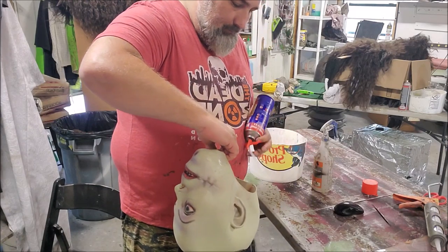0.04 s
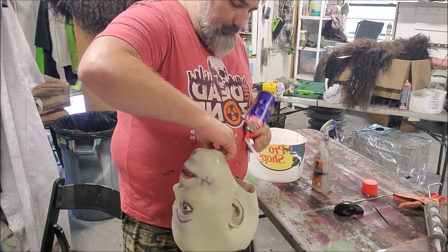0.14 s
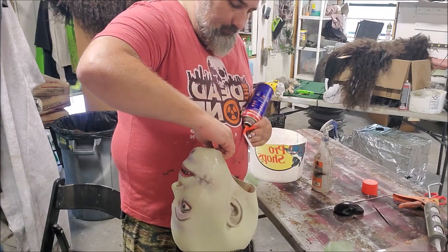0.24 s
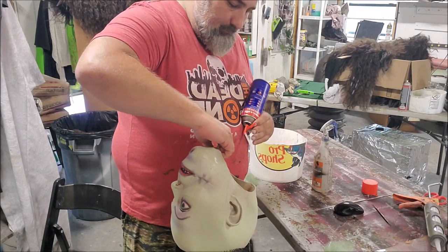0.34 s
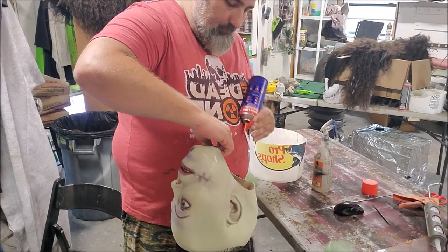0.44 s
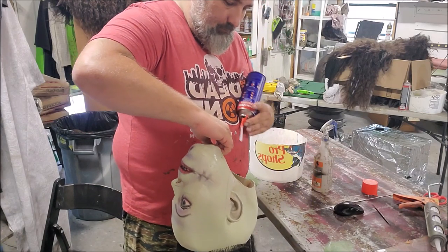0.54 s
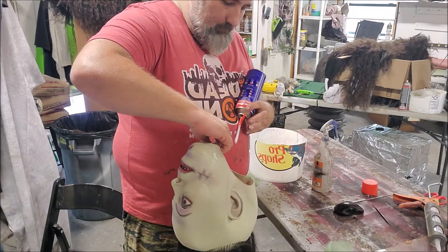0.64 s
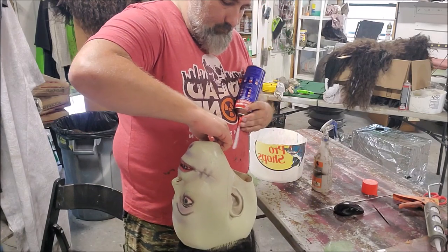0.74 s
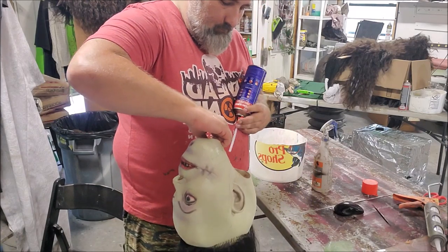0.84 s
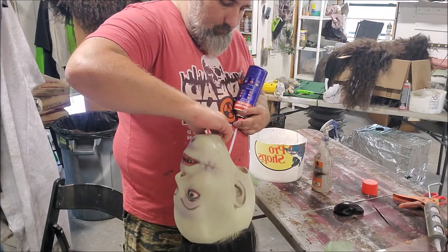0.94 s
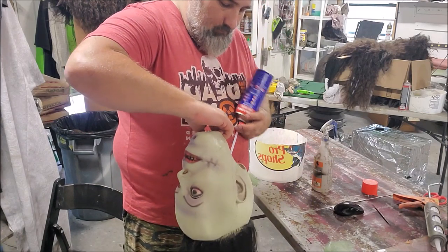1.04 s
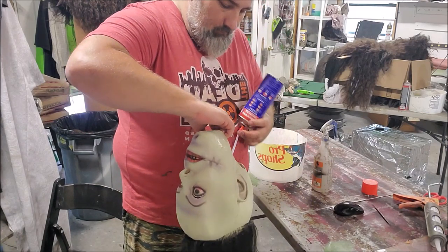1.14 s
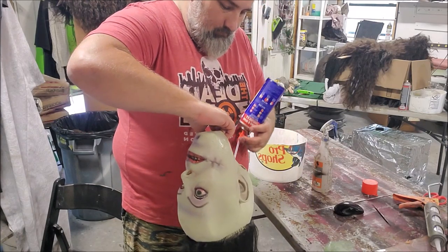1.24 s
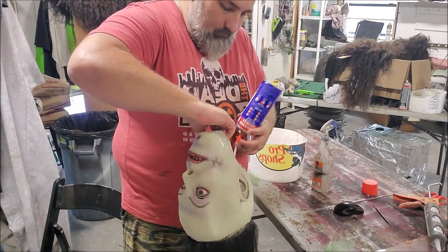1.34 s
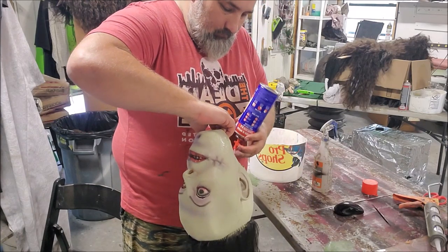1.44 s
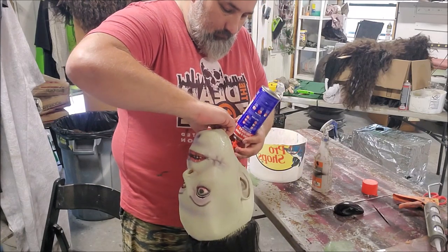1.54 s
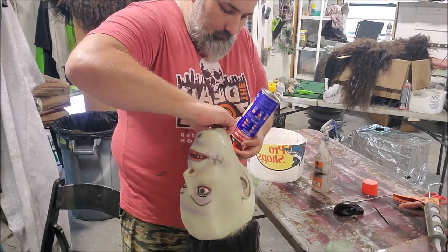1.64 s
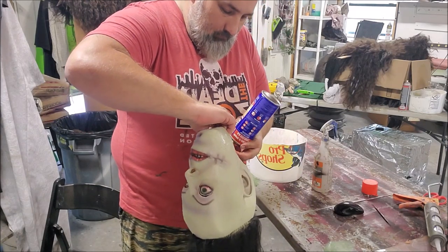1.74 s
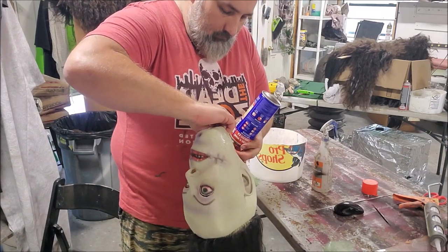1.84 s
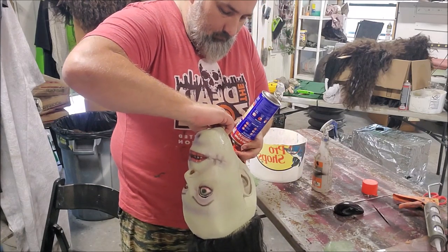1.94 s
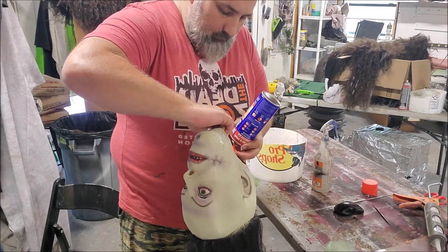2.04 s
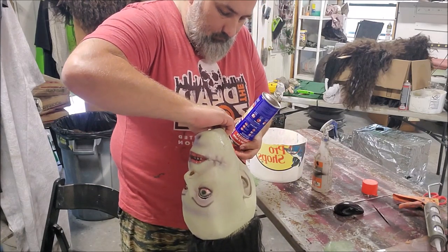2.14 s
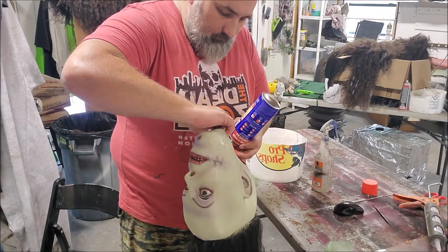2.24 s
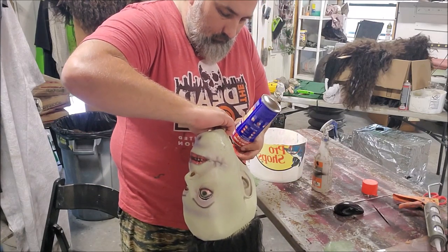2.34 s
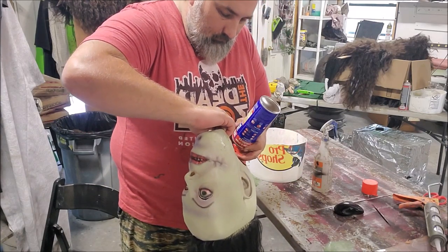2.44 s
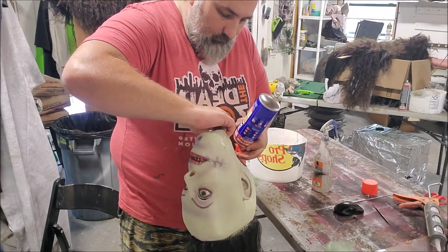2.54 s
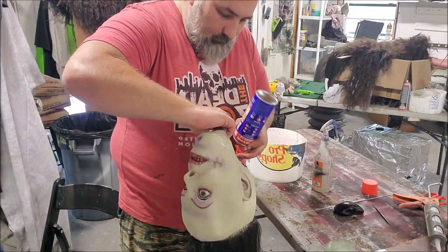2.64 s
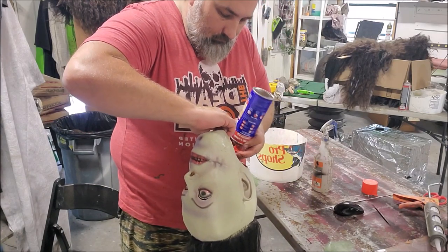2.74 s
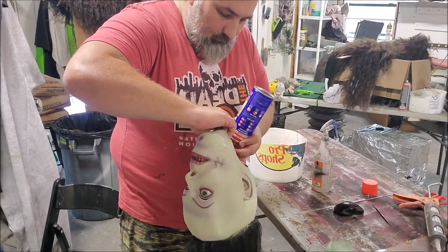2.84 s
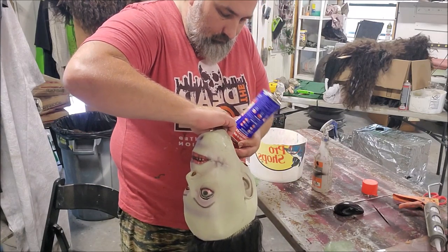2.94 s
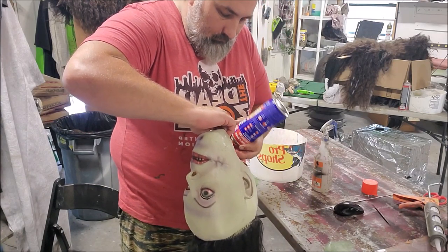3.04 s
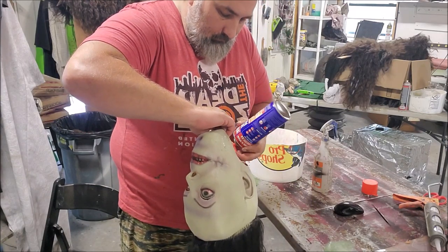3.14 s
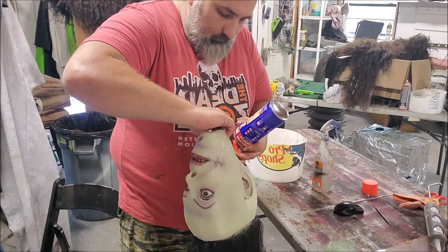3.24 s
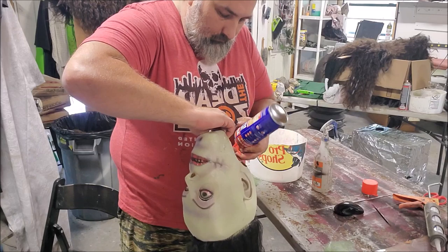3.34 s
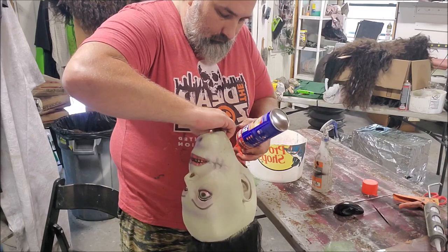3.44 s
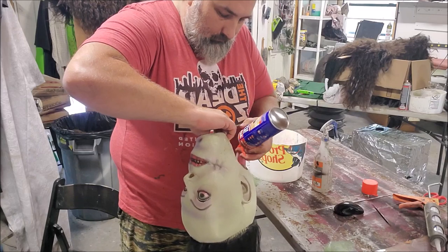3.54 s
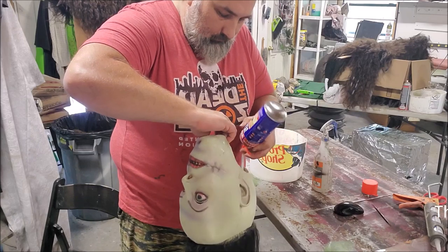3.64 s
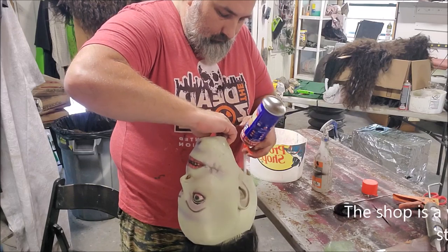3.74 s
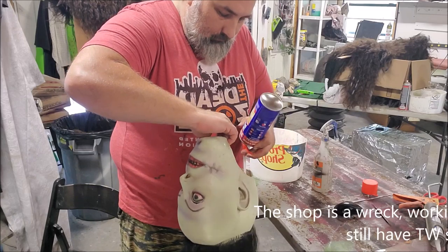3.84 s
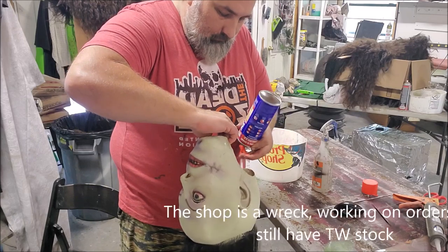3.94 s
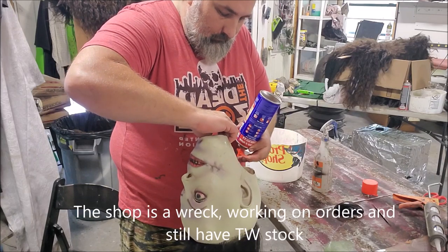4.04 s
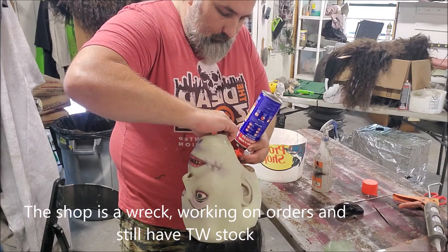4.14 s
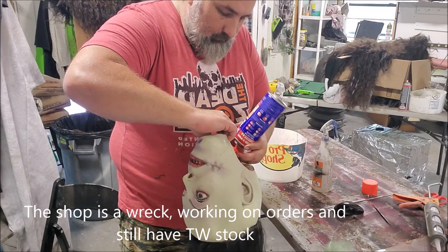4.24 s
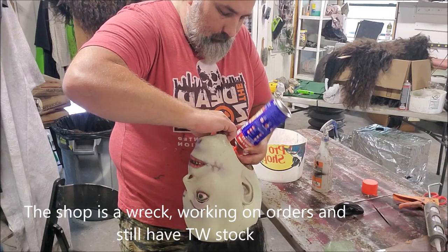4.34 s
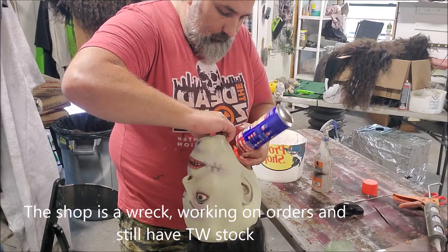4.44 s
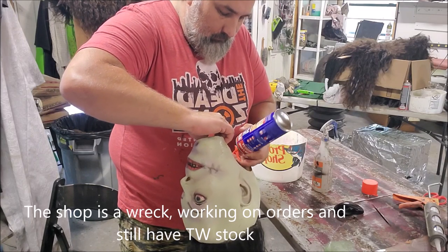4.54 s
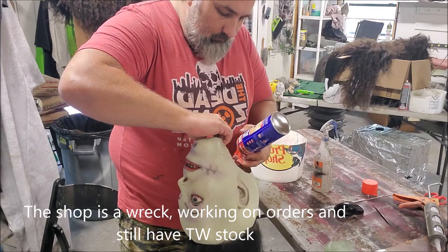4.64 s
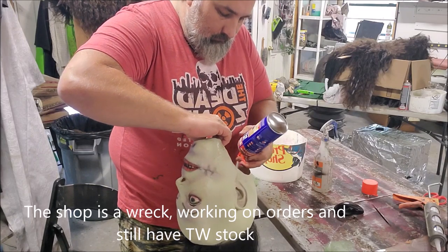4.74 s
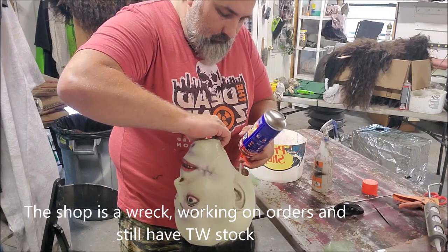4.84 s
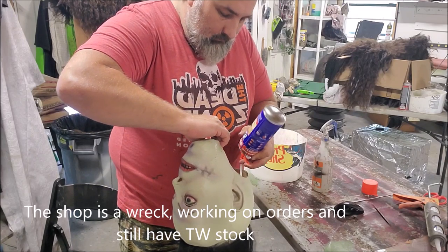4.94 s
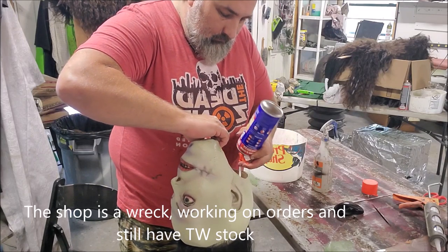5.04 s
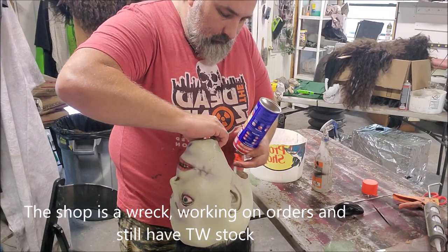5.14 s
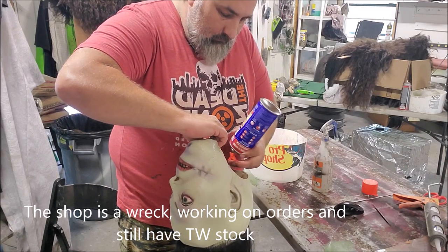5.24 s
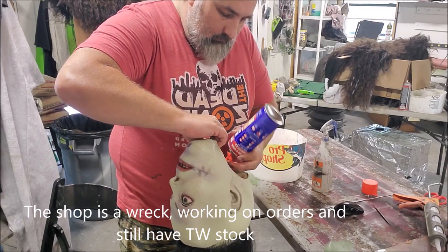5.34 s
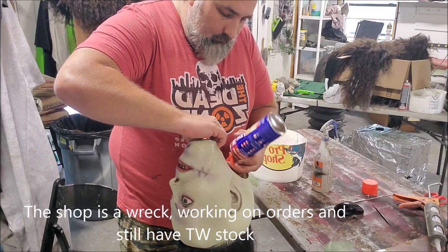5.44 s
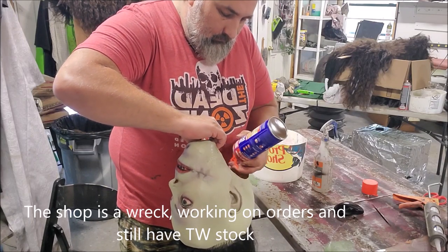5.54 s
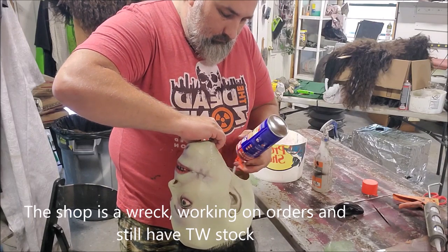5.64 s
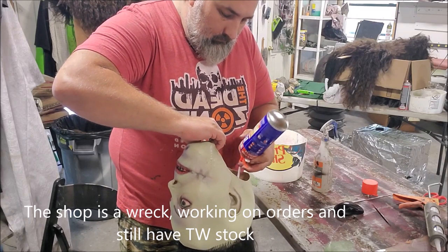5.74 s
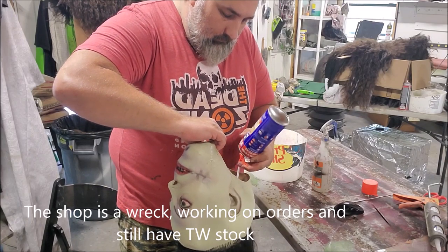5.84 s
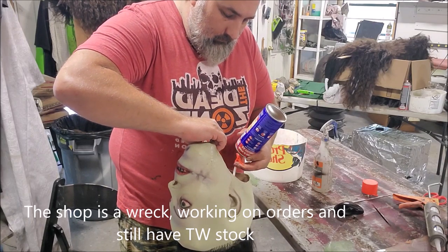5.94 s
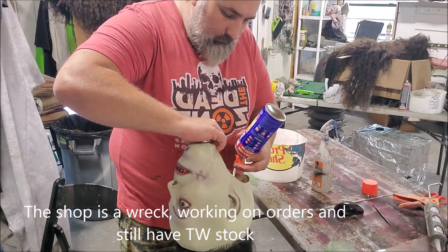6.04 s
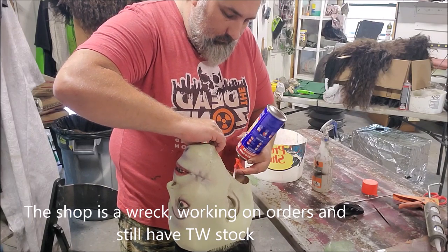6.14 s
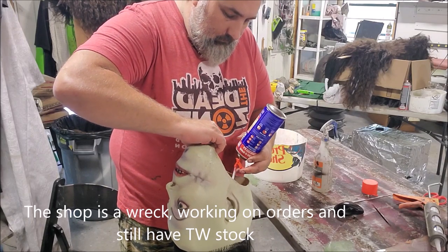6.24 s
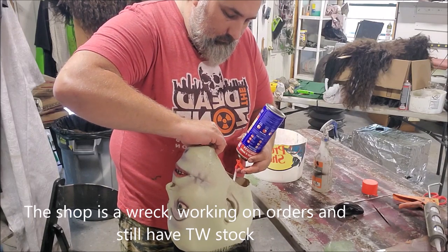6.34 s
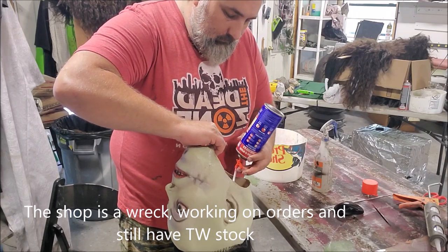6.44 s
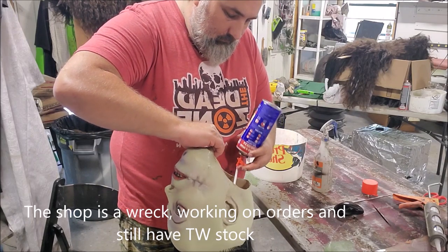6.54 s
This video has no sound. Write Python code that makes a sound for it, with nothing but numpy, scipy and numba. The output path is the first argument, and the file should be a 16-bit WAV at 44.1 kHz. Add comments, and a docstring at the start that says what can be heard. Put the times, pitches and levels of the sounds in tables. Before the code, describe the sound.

An aerosol can sprays foam into a hollow rubber mask in a workshop. A small nozzle tick and a faint leak come first, then a short wet sputter and a steady, bright, grainy hiss. Its tone wavers as the straw moves and foam churns inside the mask, until it stops abruptly. It is heard in stereo, slightly to the left and a short distance away, with quiet ventilation humming throughout.

```python
"""Foam sprayed into a rubber mask

A workshop with a low ventilation hum. The can is a little left of a stereo pair, far enough off that
the room's brief ring is about as loud as the direct sound. After faint swells of hiss, a finger ticks on
the nozzle and the valve leaks, then opens with a wet spit. The jet hisses through a straw for four
seconds and stops at once. As the straw moves about, the gaps and the hollow of the mask colour it."""
import sys
import numpy as np
from scipy import signal
from scipy.fft import rfft, irfft, next_fast_len
from scipy.io import wavfile
from numba import njit

SR = 44100
rng = np.random.default_rng(int(sys.argv[2]) if len(sys.argv) > 2 else 0)


def inscribe(sig):
    """Save sig as 16-bit PCM at rate SR to the path in sys.argv[1].

    A 1-D sig is mono; a 2-D sig holds one channel per row.
    Samples are clipped to [-1, 1] before scaling.
    """
    pcm = np.round(np.clip(np.atleast_2d(sig).T, -1, 1) * 32767)
    wavfile.write(sys.argv[1], SR, pcm.astype(np.int16))


N = 291060

# Event levels are at the source, ahead of the room; spectra and modes give only a shape.
# room tone of moving air: frequency_hz, level_db
AIR_SPECTRUM = [(25, -3), (50, -7), (110, 1), (160, -8), (270, -3.5), (450, -13), (600, -14), (880, -14.5),
                (1150, -20), (2200, -24), (3000, -36.5), (4500, -38.5), (9000, -40), (15800, -38)]
# how alike that air is at the two microphones: frequency_hz, correlation
AIR_CORRELATION = [(30, .75), (80, 1), (300, .8), (1000, 0), (4000, 0), (12000, .1)]
# faint, brief swells of hiss before the spray: start_s, length_s, level_db
FAINT_SWELLS = [(-0.02, 0.078, -68), (0.14, 0.15, -74), (0.48, 0.36, -76), (1.165, 0.23, -76),
                (1.772, 0.1, -66)]
# their soft, high hiss: frequency_hz, level_db
FAINT_HISS_SPECTRUM = [(1000, -16), (2200, 5.5), (4000, -5), (6000, -1), (8500, -13), (12000, -5),
                       (15000, -1)]
# finger on the nozzle: start_s, level_db
NOZZLE_TICKS = [(1.166, -66), (1.309, -49.5)]
# plastic click: frequency_hz, level_db
TICK_SPECTRUM = [(800, -22), (2000, 2), (3200, 4), (5000, -2), (9000, -4), (15000, -9)]
# first wet foam: frequency_hz, level_db
SPIT_SPECTRUM = [(100, -24.5), (200, -12), (310, -7.5), (400, 4), (490, -9), (680, -16.5), (880, -10.5),
                 (1050, -21.5), (1330, -5), (1550, -22), (1800, -2), (2080, -22.5), (6000, -32.5),
                 (15000, -20.5)]
# spurts of gas before the jet is steady: start_s, length_s, flow_db (0 is fully open)
VALVE_SPURTS = [(1.866, 0.022, -13), (1.923, 0.028, -10.5)]
# gas rushing from the straw: frequency_hz, level_db
RUSH_SPECTRUM = [(80, -43), (220, -24.5), (600, -17.5), (1000, -21), (1500, -13.5), (2000, -8), (2400, -1),
                 (3200, -1.5), (4100, -3), (4700, -8.5), (6000, -19), (7500, -35.5), (10000, -36)]
# tiny bubbles bursting: frequency_hz, level_db
FIZZ_SPECTRUM = [(2500, -20), (4200, 1), (5000, 2), (6500, -1), (7200, -6), (8000, -12.5), (10000, -14.5),
                 (12000, -11.5), (14500, -13), (15800, -18.5)]
# modes of the bare rubber wall under the jet: pitch_hz, width_hz, level_db
WALL_MODES = [(1360, 19, -16), (1804, 37, -2), (2136, 99, -6.5), (2690, 57, -7.5), (3284, 100, 3.5),
              (3870, 174, -7.5), (4890, 440, -11.5)]
# foam churning in the mask: frequency_hz, level_db
CHURN_SPECTRUM = [(50, -19.5), (110, -6), (170, 4), (300, 2.5), (480, -2), (610, -6), (900, -5), (1400, 2),
                  (2200, -3), (4000, -12)]
# modes of the mask's shell: pitch_hz, width_hz, level_db
SHELL_MODES = [(264, 29.3, -4.5), (360.3, 22, -2.5), (379.8, 34, 2.5), (427.5, 31, -5), (510, 50, -8.5),
               (887, 29, -5), (1297, 32, -2), (1380, 44, -7)]
# air pockets around the straw's tip: start_s, length_s, level_db, first_hz, last_hz
AIR_POCKETS = [(1.99, 0.27, -32, 4130, 3200), (2.36, 0.19, -30.5, 2720, 2780),
               (2.6, 0.15, -33.5, 3700, 3630), (3.08, 0.12, -33.5, 2580, 2300),
               (3.48, 0.26, -29.5, 3300, 2420), (3.98, 0.12, -30.5, 3007, 3230),
               (4.18, 0.091, -30.5, 2400, 2280), (4.47, 0.15, -30.5, 3825, 3700),
               (4.66, 0.17, -29.5, 3222, 3170), (5.19, 0.37, -33.5, 3270, 3880),
               (5.5, 0.23, -30.5, 2500, 3050), (5.83, 0.35, -32.5, 3370, 3100)]
# narrow gaps between straw and rubber: start_s, length_s, level_db, first_hz, last_hz
STRAW_GAPS = [(2.42, 0.24, -36, 2220, 2300), (3.42, 0.56, -33.5, 2020, 1570),
              (4.14, 0.16, -33.5, 1780, 1780), (4.49, 0.22, -32.5, 1690, 2400),
              (4.75, 0.25, -34.5, 1710, 1700), (5.48, 0.13, -33.5, 1960, 2108),
              (5.72, 0.1, -34, 1690, 1650)]
# the jet catches the mask's hollow: start_s, length_s, level_db
HOLLOW_SWELLS = [(2.42, 0.33, -42), (2.88, 0.3, -38.5), (3.36, 0.63, -37), (4.205, 0.26, -39.5),
                 (4.693, 0.33, -39.5), (5.067, 0.083, -46), (5.27, 0.16, -48.5), (5.65, 0.21, -44.5)]
# the tip dips into the foam and chokes the rush: start_s, length_s, change_db
TIP_CHOKES = [(4.278, 0.14, -3), (4.92, 0.085, -4.5)]
# room sound against direct sound: frequency_hz, level_db
ROOM_SPECTRUM = [(150, -7), (400, -10.5), (1000, 1.5), (3000, 0.5), (8000, 2.5), (15000, 5.5)]
# room decay: frequency_hz, t60_s
ROOM_DECAY = [(200, 0.94), (800, 0.3), (3000, 0.42), (12000, 0.25)]
# left microphone minus right: frequency_hz, difference_db
LEFT_LEAN = [(200, 0.8), (700, 0.1), (1300, 1.9), (2400, 1.4), (4400, 3.5), (8100, 1), (10500, 0),
             (14000, 7)]

# the valve starts to leak, cracks open, is pressed fully and is let go
LEAK_S, CRACK_S, OPEN_S, SHUT_S = 1.22, 1.866, 1.985, 6.212
SHUT_DB_PER_S = 745
TIME_S = np.arange(N) / SR


def from_db(db):
    """Decibels to gain."""
    return 10 ** (np.asarray(db) / 20)


def rms_one(x):
    """Scale to rms 1."""
    return x / np.sqrt(np.mean(x ** 2) + 1e-20)


def at_hz(points, hz):
    """Read a table on a log-frequency axis."""
    points_hz, values = np.transpose(points)
    return np.interp(np.log(np.maximum(hz, 1)), np.log(points_hz), values)


def colour(x, spectrum, power=1):
    """Filter a sound by a spectrum whose decibels are multiplied by power."""
    size = next_fast_len(x.shape[-1])
    gain = from_db(power * at_hz(spectrum, np.fft.rfftfreq(size, 1 / SR)))
    return irfft(rfft(x, size) * gain, size)[..., :x.shape[-1]]


def drift(rate_hz):
    """Smooth random wander; rms 1."""
    hz = np.fft.rfftfreq(N, 1 / SR)
    return rms_one(irfft(rfft(rng.standard_normal(N)) / (1 + (hz / rate_hz) ** 2), N))


def since(start_s):
    """Seconds gone by since a moment; zero before it."""
    return np.maximum(TIME_S - start_s, 0)


def held(start_s, stop_s, attack_s, fall_db_per_s):
    """Attack, hold, and a steady fall in dB."""
    attack = np.minimum(since(start_s) / attack_s, 1)
    return attack * from_db(-np.minimum(fall_db_per_s * since(stop_s), 200))


def swell(start_s, length_s, fade_s):
    """Fade in, hold, fade out; half height at both ends."""
    inside_s = np.minimum(TIME_S - start_s, start_s + length_s - TIME_S)
    return np.clip(.5 + inside_s / fade_s, 0, 1)


def sweeps(rows, rest_db, rest_hz, fade_s):
    """Gain and pitch of a resonance that swells and glides once a row, then returns to rest."""
    power = from_db(rest_db) ** 2
    weighted_hz = power * rest_hz
    for start, length, db, first_hz, last_hz in rows:
        weight = (from_db(db) * swell(start, length, fade_s)) ** 2
        power += weight
        weighted_hz += weight * np.interp(TIME_S, [start, start + length], [first_hz, last_hz])
    return np.sqrt(power), weighted_hz / power


def resonate(x, hz, width_hz):
    """One resonance with gain 1 at its peak."""
    radius = np.exp(-np.pi * width_hz / SR)
    feedback = [1, -2 * radius * np.cos(2 * np.pi * hz / SR), radius ** 2]
    return signal.lfilter(np.array([1, 0, -1]) * (1 - radius ** 2) / 2, feedback, x)


def body(x, modes):
    """Parallel modes, each filtered twice at double its width for dark valleys; rms 1."""
    return rms_one(sum(from_db(db) * resonate(resonate(x, hz, 2 * width), hz, 2 * width)
                       for hz, width, db in modes))


@njit
def glide(x, angle, radius):
    """A resonance whose centre moves."""
    y = np.zeros(len(x))
    for i in range(2, len(x)):
        drive = (1 - radius ** 2) / 2 * (x[i] - x[i - 2])
        y[i] = drive + 2 * radius * np.cos(angle[i]) * y[i - 1] - radius ** 2 * y[i - 2]
    return y


def moving_band(x, hz, width_hz):
    """The moving resonance twice over, for steep flanks; rms 1."""
    angle, radius = 2 * np.pi * hz / SR, np.exp(-np.pi * width_hz / SR)
    return rms_one(glide(glide(x, angle, radius), angle, radius))


def grains(per_s, spread_db, hiss_db):
    """Random pops of uneven size, like bursting bubbles, in a smooth hiss; rms 1."""
    sizes = from_db(spread_db * np.minimum(rng.exponential(1, N), 5)) * rng.choice([-1, 1], N)
    pops = rms_one(sizes * (rng.random(N) < per_s / SR))
    return rms_one(pops + from_db(hiss_db) * rng.standard_normal(N))


def ventilation(hum_hz=74.0, rumble_hz=66.6, rise_s=5.66):
    """A wavering hum and rumble, both louder near the end, under the even noise of moving air."""
    risen = np.minimum(since(rise_s) / 0.088, 1)
    hum = from_db(-60 + 7 * risen) * body(rng.standard_normal(N), [(hum_hz, 12, 0)])
    rumble = from_db(-73.5 + 2 * risen) * body(rng.standard_normal((2, N)), [(rumble_hz, 58, 0)])
    correlation = np.clip(AIR_CORRELATION, 0, [SR, .99])
    side_spectrum = [(hz, 10 * np.log10((1 - alike) / (1 + alike))) for hz, alike in correlation]
    mid, side = rms_one(colour(rng.standard_normal((2, N)), AIR_SPECTRUM))
    air = mid + colour(side, side_spectrum) * [[1], [-1]]
    return hum + rumble + from_db(-61.5) * air


def faint_hiss():
    """Faint, brief swells of soft, high, grainy hiss come before the spray."""
    envelope = sum(from_db(db) * held(start, start + length, attack_s=0.015, fall_db_per_s=103)
                   for start, length, db in FAINT_SWELLS)
    hiss = grains(per_s=2500, spread_db=4.5, hiss_db=-1.5)
    return envelope * rms_one(colour(hiss, FAINT_HISS_SPECTRUM))


def ticks(t60_s=0.022):
    """A finger makes quickly damped clicks on the plastic nozzle."""
    envelope = sum((TIME_S >= start) * from_db(db - 60 * np.minimum(since(start) / t60_s, 3))
                   for start, db in NOZZLE_TICKS)
    return envelope * rms_one(colour(rng.standard_normal(N), TICK_SPECTRUM))


def leak(pitch_hz=3170, width_hz=330, press_s=1.79):
    """A little gas sings through the barely pressed valve, louder once the finger presses harder."""
    envelope = sum(from_db(db) * held(start, CRACK_S, attack_s=0.058, fall_db_per_s=SHUT_DB_PER_S)
                   for start, db in [(LEAK_S, -83), (press_s, -66)])
    return envelope * body(rng.standard_normal(N), [(pitch_hz, width_hz, 0)])


def spit(length_s=0.095):
    """Coarse wet bubbles are pushed out ahead of the jet."""
    ooze = from_db(-21) * swell(CRACK_S - 0.025, 0.04, fade_s=0.02)
    burst = held(CRACK_S, CRACK_S + length_s, attack_s=0.012, fall_db_per_s=131.5)
    bubbles = grains(per_s=1100, spread_db=4, hiss_db=6)
    return from_db(-29.5) * (ooze + burst) * rms_one(colour(bubbles, SPIT_SPECTRUM))


def valve(attack_s=0.007, fall_db_per_s=400):
    """Flow through the valve: it cracks open, spurts, opens fully and snaps shut."""
    cracked = from_db(-18.5) * held(CRACK_S, OPEN_S, attack_s, fall_db_per_s)
    spurts = [from_db(db) * held(start, start + length, attack_s, fall_db_per_s)
              for start, length, db in VALVE_SPURTS]
    fully_open = held(OPEN_S, SHUT_S, attack_s=0.022, fall_db_per_s=SHUT_DB_PER_S)
    return np.max([cracked, *spurts, fully_open], axis=0)


def stream():
    """The grainy flow of gas and foam that drives each resonance of the mask."""
    return grains(per_s=4000, spread_db=2.5, hiss_db=0)


def jet(choke, surge_s=0.1, rush_sag_db_per_s=0.9, fizz_sag_db_per_s=1.97):
    """Gas rushes and bubbles fizz out of the straw; both surge, then sag as the can loses pressure."""
    age_s = since(OPEN_S)
    surge = np.exp(-age_s / surge_s)
    rush_db = -27.5 - rush_sag_db_per_s * age_s + 7 * surge + 0.92 * drift(rate_hz=12)
    fizz_db = -33.5 - fizz_sag_db_per_s * age_s + 6 * surge + drift(rate_hz=3.9)
    rush = from_db(rush_db) * rms_one(colour(stream(), RUSH_SPECTRUM))
    bubbles = grains(per_s=1100, spread_db=7, hiss_db=9.5)
    fizz = from_db(fizz_db) * rms_one(colour(bubbles, FIZZ_SPECTRUM))
    return choke * rush + choke ** 0.71 * fizz


def bare_wall(coated_s=2.33, fade_db_per_s=52):
    """The rubber wall rings under the jet until foam coats it."""
    return from_db(-26 - fade_db_per_s * since(coated_s)) * body(stream(), WALL_MODES)


def churning_foam(gap_gain, growth_db_per_s=2.56):
    """Foam churns louder as it gathers and as open gaps stir it; returns sound and gain."""
    gathered = from_db(-53 + growth_db_per_s * since(OPEN_S))
    gain = np.hypot(gathered, from_db(-15) * gap_gain)
    return gain * rms_one(colour(stream(), CHURN_SPECTRUM)), gain


def mask_shell(churn_gain):
    """The shell rings harder the more foam churns inside it."""
    return from_db(-28) * churn_gain ** 0.28 * body(stream(), SHELL_MODES)


def air_pockets():
    """Pockets of air form around the straw's tip and ring brightly."""
    gain, pitch_hz = sweeps(AIR_POCKETS, rest_db=-41, rest_hz=3250, fade_s=0.034)
    return gain * moving_band(stream(), pitch_hz, width_hz=730)


def straw_gaps():
    """Narrow gaps open between straw and rubber and ring in the flow; returns sound and gain."""
    gain, pitch_hz = sweeps(STRAW_GAPS, rest_db=-45.5, rest_hz=1710, fade_s=0.095)
    return gain * moving_band(stream(), pitch_hz, width_hz=456), gain


def mask_hollow(first_hz=808.5, sag_hz_per_s=32.5, second_db_per_s=1.5):
    """The jet sounds two modes of the hollow; as it fills, both sink and the second gains."""
    age_s = since(OPEN_S)
    swells = sum(from_db(db) * swell(start, length, fade_s=0.063) for start, length, db in HOLLOW_SWELLS)
    pitch_hz = first_hz - sag_hz_per_s * age_s
    first_mode = from_db(-4.5) * moving_band(stream(), pitch_hz, width_hz=123)
    second_gain = from_db(-8.5 + second_db_per_s * age_s)
    second_mode = second_gain * moving_band(stream(), 1.443 * pitch_hz, width_hz=244)
    return (from_db(-46) + swells) * (first_mode + second_mode)


def shifting_walls(x, share, count=5, sway_s=0.0003046):
    """Echoes off the mask's walls and the hands, whose paths change as the can moves."""
    samples = np.arange(N)
    lags_s = [lag + sway_s * drift(rate_hz=1) for lag in np.geomspace(.001, .004, count)]
    echoes = sum((-1) ** k * np.interp(samples - SR * np.abs(lag), samples, x)
                 for k, lag in enumerate(lags_s))
    return (x + share * echoes) / np.sqrt(1 + count * share ** 2)


def mask_notch(x, hz=990, width_hz=150, filling_s=(2.9, 3.5)):
    """Between the hollow's two modes the sound nearly cancels; the dip eases as foam fills the mask."""
    depth = np.interp(TIME_S, filling_s, [0.85, 0.41])
    return x - depth * resonate(x, hz, width_hz)


def spray():
    """The jet and all it stirs in the mask sputter together, as liquid and gas leave in uneven slugs."""
    choke = from_db(sum(db * swell(start, length, fade_s=0.043) for start, length, db in TIP_CHOKES))
    hiss = jet(choke)
    gaps, gap_gain = straw_gaps()
    churn, churn_gain = churning_foam(gap_gain)
    ringing = choke * air_pockets() + gaps + mask_hollow() + mask_shell(churn_gain) + bare_wall()
    sputter = from_db(0.59 * drift(rate_hz=21))
    return mask_notch(valve() * sputter * (shifting_walls(hiss + churn, share=0.33) + ringing))


def reflections(build_s=0.00071):
    """Dense echoes off the clutter, different at each microphone, lasting longest in the bass."""
    t, hz = TIME_S[:SR // 2], np.fft.rfftfreq(SR // 2, 1 / SR)
    edges_hz = [0, *np.geomspace(150, 12000, 8), SR]
    spectrum = rfft(rng.standard_normal((2, len(t)))) * from_db(at_hz(ROOM_SPECTRUM, hz))
    tail = 0
    for low, high in zip(edges_hz, edges_hz[1:]):
        band = (hz >= low) & (hz < high)
        t60_s = at_hz(ROOM_DECAY, hz[band].mean())
        envelope = from_db(-60 * t / t60_s) * (1 - np.exp(-t / build_s))
        tail += irfft(spectrum * band, len(t)) * envelope / np.linalg.norm(envelope)
    return tail


def workshop(x, positions=18):
    """Direct sound plus the room; the can moves, so each stretch of time finds other reflections."""
    place = np.linspace(0, positions - 1, N)
    room = np.zeros((2, N + SR))
    for k in range(positions):
        near = np.flatnonzero(np.abs(place - k) < 1)
        crossfade = np.cos(np.pi / 2 * (place[near] - k))
        echoes = signal.fftconvolve((x[near] * crossfade)[None], reflections(), axes=1)
        room[:, near[0]:near[0] + echoes.shape[1]] += echoes
    direct = np.array([shifting_walls(x, share=0.14) for microphone in "LR"])
    return direct + room[:, :N]


def scene():
    """The can is held a little left of the microphones, with the room tone all around."""
    at_microphones = workshop(spray() + spit() + ticks() + faint_hiss() + leak())
    placed_left = colour(at_microphones, LEFT_LEAN, power=np.array([[0.5], [-0.5]]))
    return from_db(-3) * placed_left + ventilation()


def record(dry, cutoff_hz=15850):
    """A steep low-pass takes off the very top."""
    return signal.sosfilt(signal.ellip(12, .1, 80, cutoff_hz, fs=SR, output="sos"), dry)


dry = scene()
out = record(dry)
inscribe(out)
```